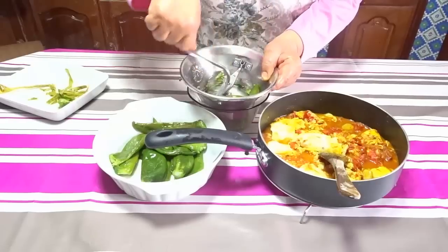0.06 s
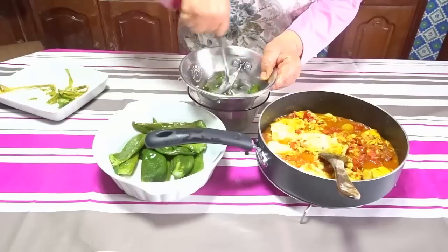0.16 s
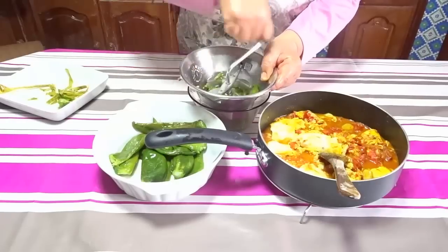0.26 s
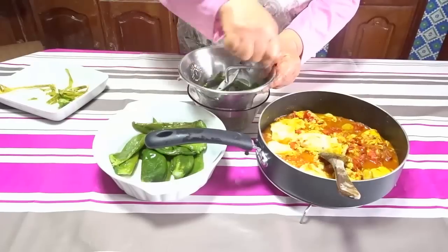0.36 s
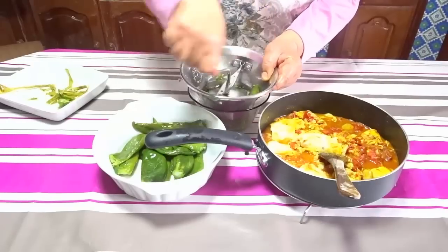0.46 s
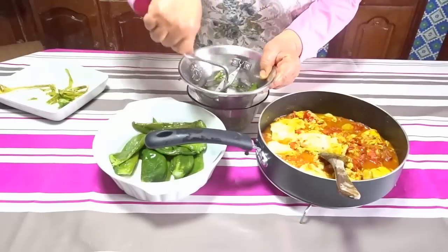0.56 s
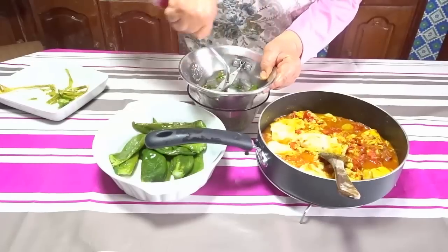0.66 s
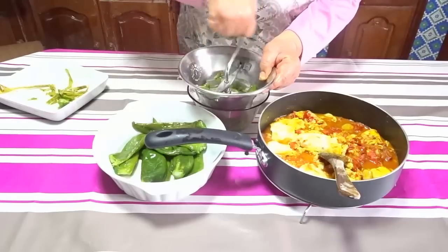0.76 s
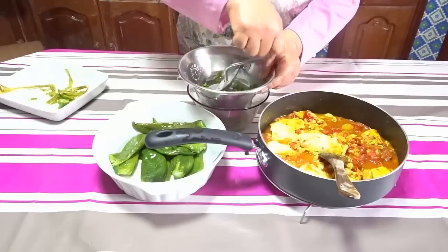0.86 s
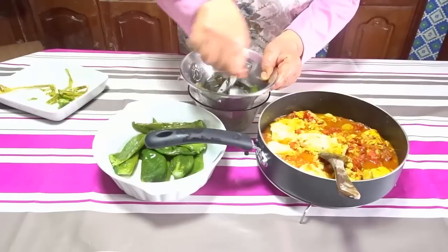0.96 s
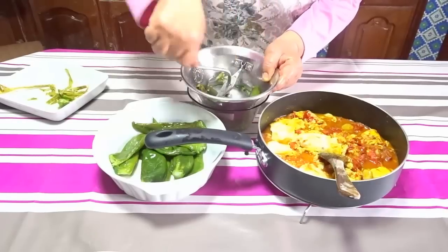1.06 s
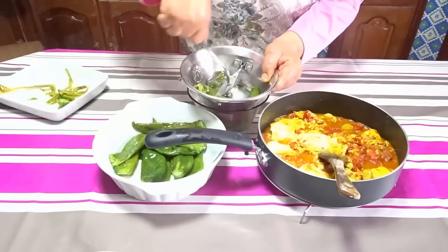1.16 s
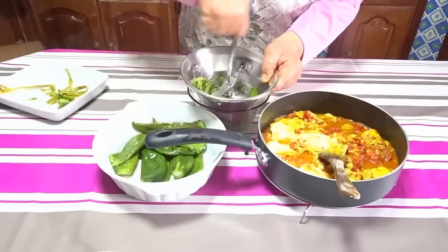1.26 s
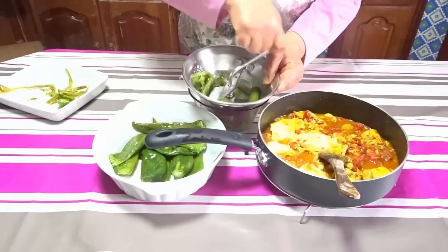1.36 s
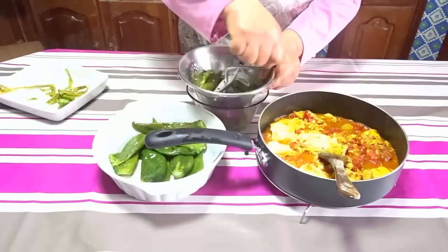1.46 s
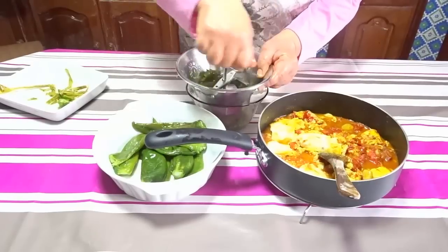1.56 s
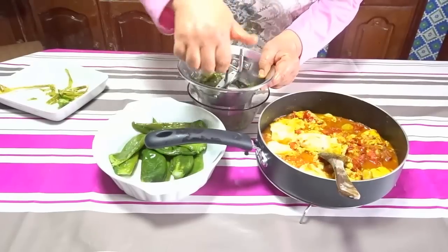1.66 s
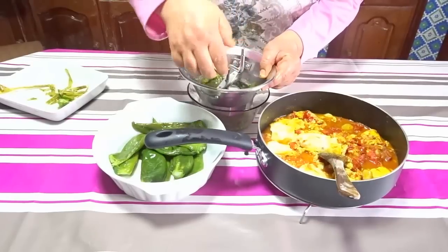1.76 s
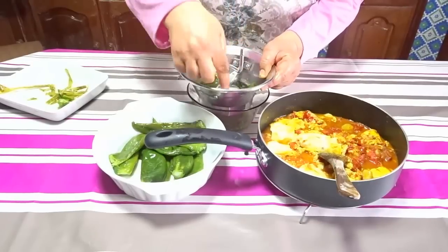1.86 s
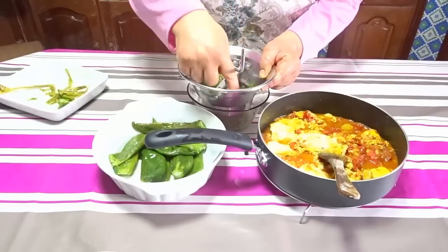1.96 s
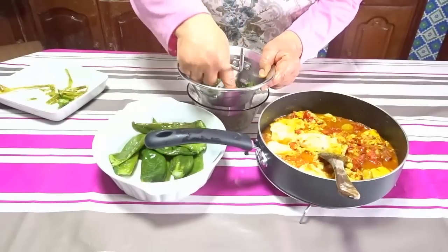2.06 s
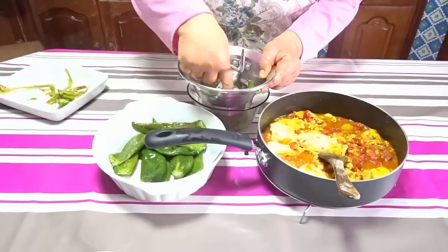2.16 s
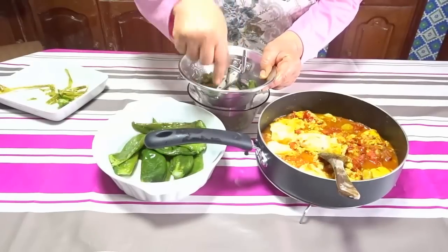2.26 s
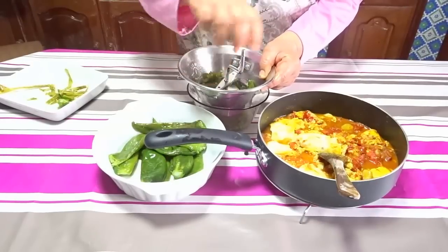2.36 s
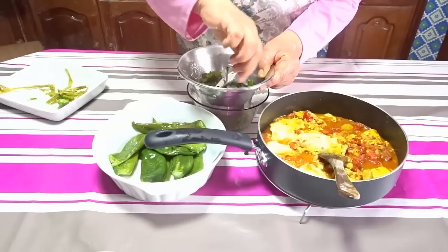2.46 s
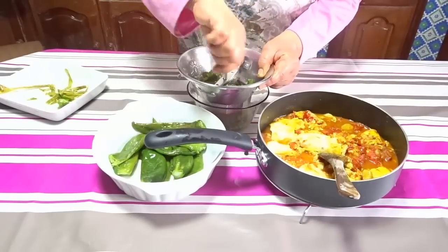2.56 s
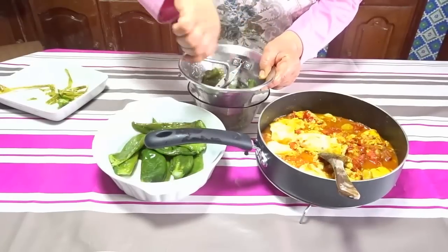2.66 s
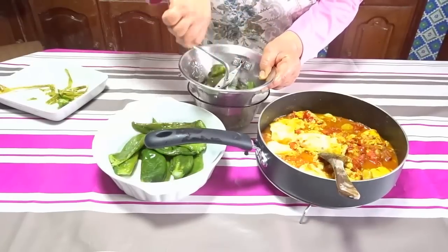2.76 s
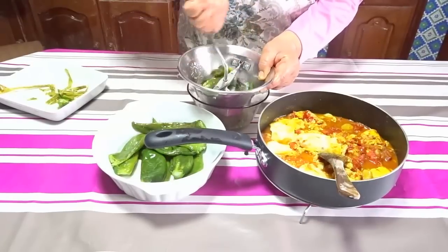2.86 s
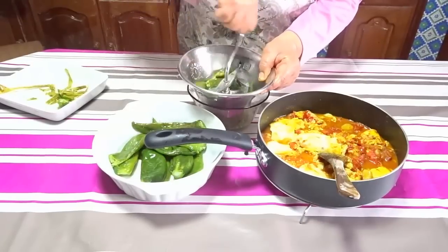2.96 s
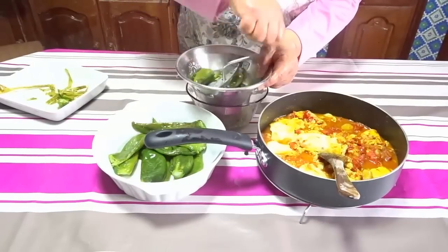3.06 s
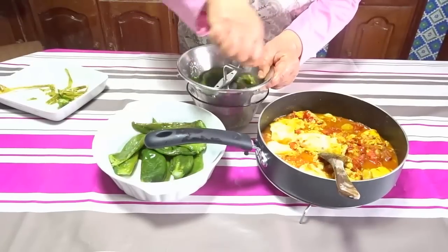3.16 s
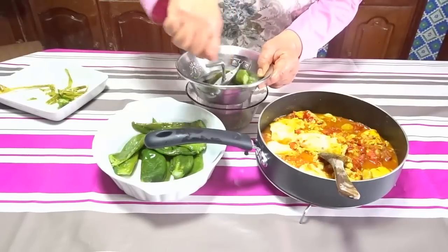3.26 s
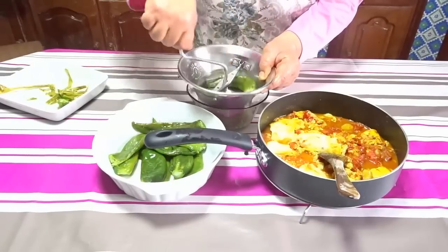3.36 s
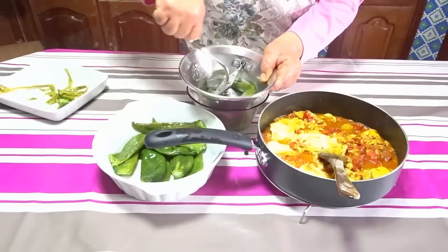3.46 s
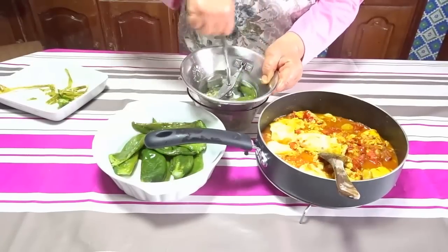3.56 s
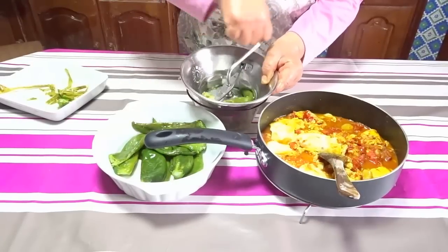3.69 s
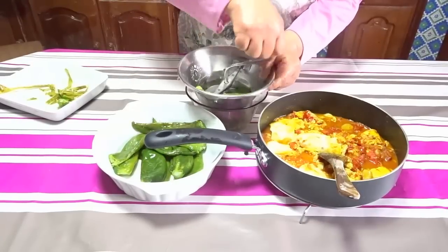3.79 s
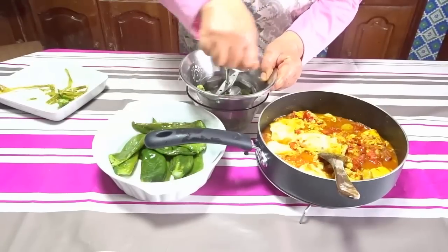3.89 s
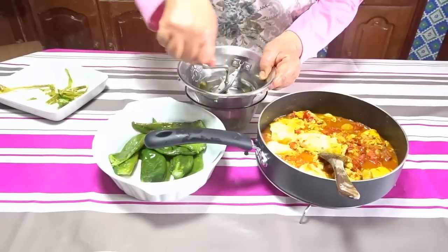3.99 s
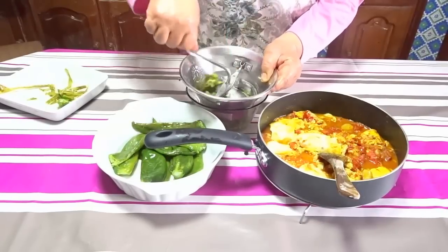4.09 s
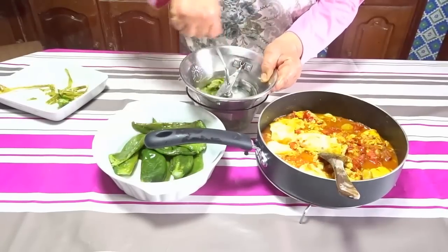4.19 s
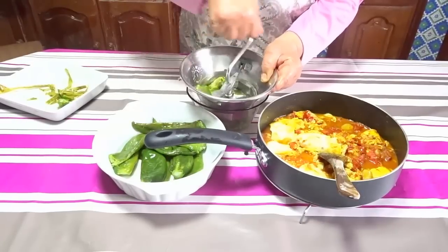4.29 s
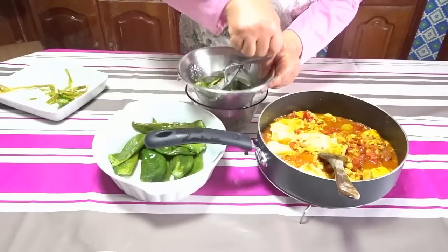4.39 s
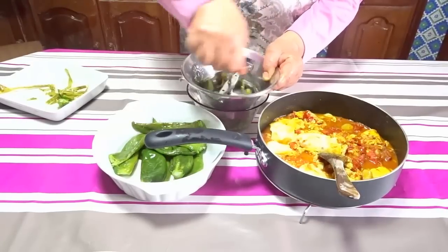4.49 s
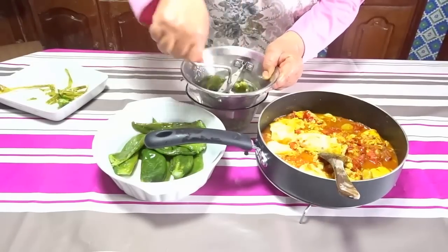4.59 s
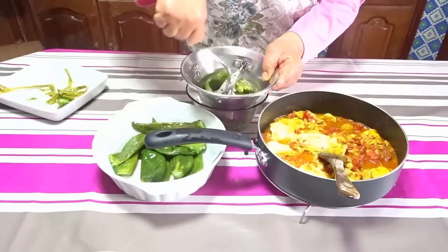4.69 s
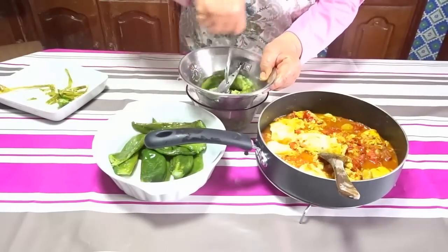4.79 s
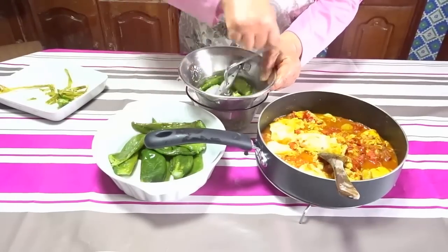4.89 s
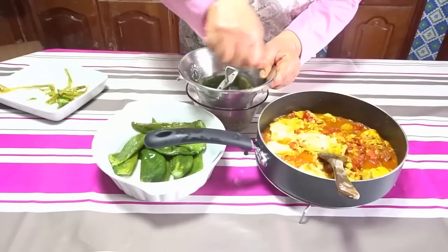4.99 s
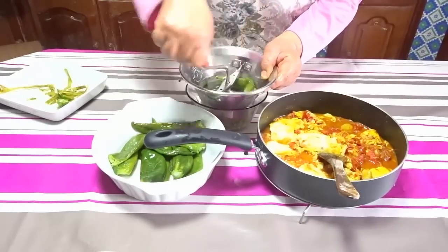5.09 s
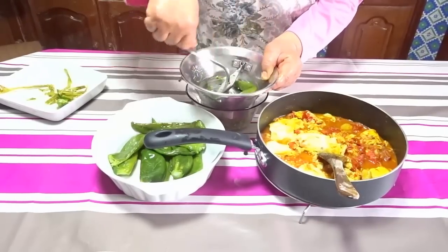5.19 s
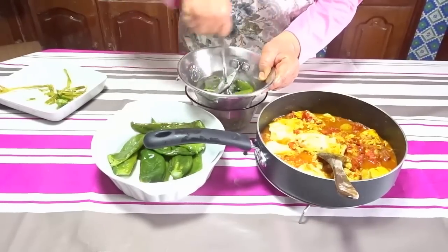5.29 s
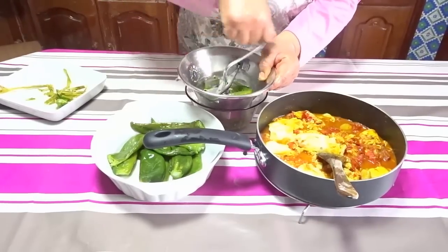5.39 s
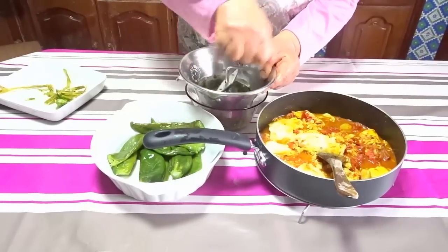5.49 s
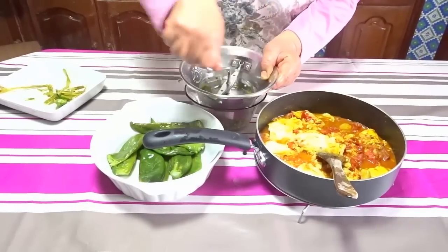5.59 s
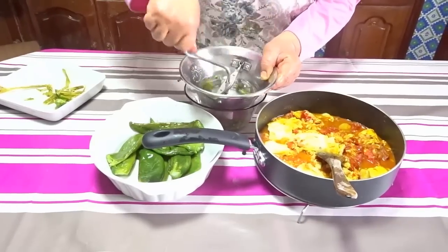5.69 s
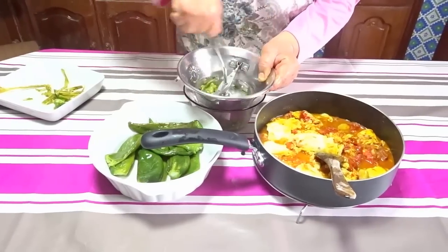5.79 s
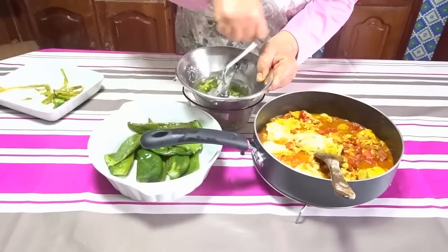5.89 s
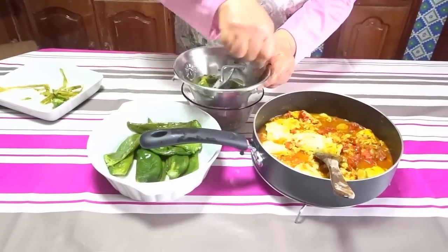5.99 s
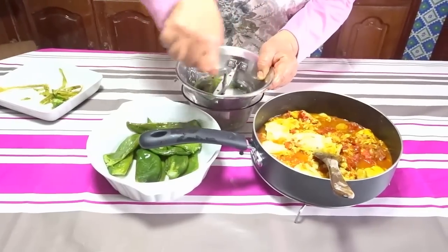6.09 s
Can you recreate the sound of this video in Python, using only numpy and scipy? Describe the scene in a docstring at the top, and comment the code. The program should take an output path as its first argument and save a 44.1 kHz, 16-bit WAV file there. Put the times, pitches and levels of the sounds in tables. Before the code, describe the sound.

Steel food mill turning over a glass bowl in a kitchen: rasping strokes, cracks and clinks, a short lull, then busier cranking.

```python
"""Scraping and sharp cracks: a steel food mill, hand-cranked over a glass bowl on a kitchen table.
The blade rasps over the perforated disc, which drones, and catches with cracks. The mill rocks and
knocks the bowl; glass and steel ring, the table thumps, a loose part pings. The work nearly stops
a little after 2 s, then resumes. The kitchen adds a short tail and a steady hush."""
import sys
import numpy as np
from scipy import signal
from scipy.fft import rfft, irfft
from scipy.io import wavfile
from scipy.ndimage import uniform_filter1d

SR = 44100
rng = np.random.default_rng(int(sys.argv[2]) if len(sys.argv) > 2 else 0)


def dump(signal):
    """Clip the signal to [-1, 1] and save it as 16-bit WAV at the path in sys.argv[1]."""
    limited = np.clip(np.atleast_2d(signal).T, -1, 1)
    pcm = np.round(limited * 32767).astype(np.int16)
    wavfile.write(sys.argv[1], SR, pcm)


N = 270774

# Scraping effort. Each row: time in seconds, blade rasp in dB, disc drone in dB.
SCRAPE_LEVELS = [(0.0, -33, -39), (0.17, -49.5, -79), (0.45, -39, -42.5), (0.72, -41.5, -41.5),
                 (0.99, -43, -43.5), (1.17, -37, -39.5), (1.47, -45.5, -46), (1.599, -49, -57),
                 (2.05, -62.5, -55), (2.33, -97, -75), (2.6, -57.5, -68), (2.85, -43.5, -41.5),
                 (3.05, -46.5, -52), (3.57, -37.5, -41), (3.8, -45.5, -48.5), (4.05, -45.5, -56),
                 (4.27, -34.5, -50), (4.37, -54, -54), (4.51, -38.5, -45), (4.79, -39, -52),
                 (4.9, -45.5, -43), (5.27, -35, -41.5), (5.39, -44, -50), (5.878, -33.5, -45),
                 (6.02, -45.5, -60), (6.14, -30, -29)]
# Disc damped by pulp. Each row: frequency in Hz, bandwidth in Hz, level in dB.
DISC_MODES = [(800, 53, -5.5), (844.3, 33, 4), (880, 7, -9), (946, 51, -0.5), (1017, 83, -3.5),
              (1860, 120, -9.5), (4800, 120, -6)]
# Kitchen table. Each row: frequency in Hz, level in dB, T60 in seconds.
TABLE_MODES = [(116, -3, 0.097), (154.3, 1.5, 0.096), (181, -1, 0.13), (240, -0.6, 0.18),
               (288.6, -2.5, 0.099), (423, -12, 0.12)]
# Contact noise. Each row: frequency in Hz, spectral level in dB.
CRACK_SPECTRUM = [(120, -30), (200, -8.5), (500, -10), (2210, -2.5), (2610, -5), (3190, -4.5), (4040, -9.5),
                  (4950, -8), (5840, -12), (9750, -17.5), (16000, -26.5)]


def gain(db):
    return 10 ** (np.asarray(db) / 20)


def decay(t, t60_s):
    return gain(-60 * t / t60_s)


def attack(t, rise_s):
    return np.minimum(t / rise_s, 1)


def unit_rms(x):
    return x / np.sqrt(np.mean(x ** 2) + 1e-20)


def unit_peak(x):
    return x / (abs(x).max() + 1e-20)


def curve_at(points, hz):
    knots_hz, values = np.transpose(points)
    return np.interp(np.log(hz + 1), np.log(knots_hz + 1), values)


def add(mix, start_s, sound):
    part = mix[max(round(start_s * SR), 0):][:len(sound)]
    part += sound[:len(part)]


def colour(x, points, shelf_hz=0, shelf_db=0):
    """Filter by (Hz, dB) points and a high shelf."""
    hz = np.fft.rfftfreq(x.shape[-1], 1 / SR)
    shelf = hz ** 2 / (hz ** 2 + shelf_hz ** 2 + 1)
    return irfft(rfft(x) * gain(curve_at(points, hz) + shelf_db * shelf), x.shape[-1])


def resonate(x, hz, width_hz):
    """Two-pole resonance, centre gain near 1."""
    r, w = np.exp(-np.pi * width_hz / SR), 2 * np.pi * hz / SR
    return signal.lfilter([2 * (1 - r) * np.sin(w)], [1, -2 * r * np.cos(w), r * r], x)


def struck(modes, t, rise_s, spread_db):
    """Decaying sines; the struck spot varies each mode's level."""
    hz, db, t60_s = np.transpose(modes)[:, :, None]
    spot = rng.standard_normal((len(modes), 1))
    envelopes = gain(db + spread_db * spot) * decay(t, np.clip(t60_s, 0.03, 1))
    sines = np.sin(2 * np.pi * hz * t + 20 * spot[::-1])
    return unit_peak((envelopes * sines).sum(0) * attack(t, rise_s))


def impulses(per_s, scale_db):
    """Random impulses, mostly small."""
    sizes = gain(scale_db * np.minimum(rng.exponential(1, N), 4))
    return sizes * (rng.random(N) < per_s / SR)


def diffuse_noise(samples):
    """Stereo noise, alike in the bass, independent in the treble."""
    # Each row: frequency in Hz, left-right correlation.
    coherence = [(60, 0.99), (180, 1), (550, 0.86), (1650, 0.53), (4970, 0.05), (15000, 0.04)]
    mid, side = rfft(rng.standard_normal((2, samples)))
    angle = np.arccos(np.clip(curve_at(coherence, np.fft.rfftfreq(samples, 1 / SR)), -1, 1)) / 2
    mid, side = np.cos(angle) * mid, np.sin(angle) * side
    return irfft([mid + side, mid - side], samples)


def scrape():
    """The blade rubs over wet holes in uneven clumps; the disc drones, the table rumbles."""
    # Blade edge. Each row: frequency in Hz, spectral level in dB.
    rasp_spectrum = [(180, -33), (300, -2), (574, -7.5), (870, 1.5), (1340, -1.5), (8790, -6.5),
                     (13800, -16.5), (16000, -75)]
    times_s, *levels_db = np.transpose(SCRAPE_LEVELS)
    rasp_db, drone_db = (np.interp(np.arange(N) / SR, times_s, db) for db in levels_db)
    rumble_db = rasp_db + 0.63 * (drone_db - rasp_db) - 7.5
    wander = uniform_filter1d(uniform_filter1d(rng.standard_normal(N), 300), 300)
    clumps = gain(2.14 * unit_rms(wander))
    ticks = impulses(per_s=4000, scale_db=2.1) * rng.choice([-1, 1], N)
    friction = unit_rms(0.5 * unit_rms(ticks) + rng.standard_normal(N)) * clumps
    drone = sum(gain(db) * resonate(resonate(friction, hz, 2 * width_hz), hz, width_hz)
                for hz, width_hz, db in DISC_MODES)
    tilt_db_per_octave, lowest_hz = -14.5, TABLE_MODES[0][0]  # slow rubbing favours low modes
    rumble = sum(gain(db + tilt_db_per_octave * np.log2(hz / lowest_hz))
                 * resonate(friction, hz, 3.7 / t60_s) for hz, db, t60_s in TABLE_MODES)
    rasp = unit_rms(colour(friction, rasp_spectrum)) + gain(-4.5) * crackle()
    return gain(drone_db) * unit_rms(drone) + gain(rasp_db) * rasp + gain(rumble_db) * unit_rms(rumble)


def crackle():
    """Small catches on skins and seeds, milliseconds each."""
    catches = impulses(per_s=60, scale_db=3.15)
    envelope = signal.oaconvolve(catches, decay(np.arange(2048) / SR, t60_s=0.011))[:N]
    bursts = envelope * rng.standard_normal(N)
    return unit_rms(unit_rms(colour(bursts, CRACK_SPECTRUM)) + 0.85 * unit_rms(disc_clank(bursts)))


def disc_clank(force):
    """The damped disc answers a catch with a hollow clank."""
    return sum(gain(db) * resonate(force, hz, width_hz) for hz, width_hz, db in DISC_MODES)


def crack(noise, hz, treble_db, chatter_db, clank_db):
    """Sharp contact: the touched spot rings briefly, loose parts chatter, the disc clanks."""
    t = np.arange(len(noise)) / SR
    burst = unit_rms(colour(noise, CRACK_SPECTRUM, shelf_hz=3250, shelf_db=treble_db + 18.5))
    burst *= attack(t, rise_s=0.00034)
    contact = unit_peak(burst * decay(t, t60_s=0.0088))
    snap = decay(t, t60_s=0.014) * np.sin(2 * np.pi * hz * t)
    chatter = gain(chatter_db) * unit_peak(burst * decay(t, t60_s=0.26))
    clank = gain(clank_db) * unit_peak(disc_clank(contact))
    return unit_peak(contact + gain(-3) * snap) + chatter + clank


def bowl_and_mill(t, noise, bowl_db):
    """Glass bowl and steel mill ring from the blow and its rebounds."""
    # Each row: frequency in Hz, level in dB, T60 in seconds.
    bowl_modes = [(998, -9.5, 0.24), (1118, -14, 0.2), (1200, -11.5, 0.22), (1400, -11, .2),
                  (1595, -3.5, 0.5), (1838, -8, 0.4), (1970, -10, 0.3), (2795, -8.5, 0.28), (3198, -8, 0.2),
                  (3455, -7, 0.2), (4330, -10, 0.2), (4400, -14, 0.22), (4920, -14.5, 0.16),
                  (5200, -16, 0.15), (6160, -15.5, 0.18), (6560, -14, .12)]
    mill_modes = [(1496, -10, 0.074), (1670, 8, 0.067), (1767, -24, 0.33), (1767, -14, 0.043),
                  (2100, -4, 0.084), (2183, 8, 0.048), (2300, -0.5, 0.18), (2352, 4.5, 0.08),
                  (2610, -38, 0.04), (3400, 0.5, 0.091), (3654, 8.5, 0.05), (3680, -10, 0.38),
                  (5020, 7, 0.026), (4800, -28, .1), (5660, -37, 0.12), (8680, -1.5, 0.044)]
    blow_t = np.arange(len(noise)) / SR
    blows = (blow_t == 0) + gain(-21.5) * decay(blow_t, t60_s=0.12) * noise
    out = np.zeros(len(t))
    for modes, rise_s, db in (bowl_modes, 0.00072, bowl_db), (mill_modes, 0.003, -14.5):
        ring = struck(modes, t, rise_s, spread_db=2.5)
        out += gain(db) * unit_peak(signal.fftconvolve(ring, blows)[:len(t)])
    return out


def knocks():
    """The blade catches or the mill rocks: a crack, ringing, a thump of the table."""
    # Each row: start in seconds, crack level in dB, crack pitch in Hz,
    # then relative thump, treble and bowl levels in dB.
    blows = [(0.004, -14.5, 2240, -29, -20, -13), (0.109, -17.5, 3120, -18, -6, -15),
             (0.127, -2, 1493, -14.5, -17, -11), (0.212, -8.5, 1670, -34, -17, -15),
             (0.281, -6, 1810, -25, -19, -27), (0.341, -11, 6370, -25, -17, -32),
             (0.419, -33, 3080, -16, -13, -11), (0.493, -11, 2400, -11.5, -30, -16),
             (0.595, -19, 1820, -34, -22, -21), (0.618, -16.5, 1620, -35, -2, -35),
             (0.647, -19.5, 2870, -43, -24, -26), (0.722, -11, 1940, -36, -19, -40),
             (0.875, -16.5, 4910, -34, -10, -17), (1.006, -15, 2050, -41, -25, -32),
             (1.053, -17, 1490, -14, -14, -9), (1.068, -2.5, 3540, -16, -20, -8),
             (1.195, -13, 3440, -12, -17, -6.5), (1.211, -8, 2020, -10.5, -21, -17),
             (1.225, -8, 1880, -26, -34, -11.5), (1.354, -13.5, 1860, -38, -18, -25),
             (1.4, -10, 4730, -16.5, -12, -25), (1.478, -12.5, 1830, -51, -14.5, -28),
             (1.771, -19, 1730, -13, -38, -7), (1.889, -16.5, 1780, -13, -24.5, -13),
             (2.141, -22.5, 3180, -8, -32.5, -6.5), (2.552, -32, 2150, -30, -21, -27),
             (2.75, -25.5, 2850, -31, 19, -30), (2.8, -21, 1790, -49, -51, -29),
             (2.812, -29, 1800, -38, -18, -14), (2.836, -20, 1840, -49, 3, -28),
             (2.878, -21.5, 6310, -42, -15, -17), (2.898, -19, 1830, -44, -22, -32),
             (2.922, -19.5, 4130, -46, -15, -19), (2.969, -22, 1850, -21, -21, -31),
             (3.087, -20.5, 1700, -21, -15, -25), (3.385, -27, 4630, -15, 9, -16),
             (3.497, -22.5, 6750, -12.5, 11, -24), (3.559, -19, 2100, -13, -55, -29),
             (3.631, -10, 2290, -10.5, -13, -31), (3.664, -11, 1280, -9.5, -10, -30),
             (3.782, -21, 1950, -10, -64, -14.5), (3.8, -16.5, 3200, -13, -28, -7),
             (3.92, -21.5, 2280, -12.5, -39, -10), (4.092, -12.5, 1890, -16, -26.5, -24),
             (4.145, -7.5, 2800, -23.5, -11, -30), (4.251, -11.5, 1840, -12.5, -18, -15),
             (4.316, -11, 1650, -16, -20, -21.5), (4.443, -11.5, 2930, -23, -5, -12),
             (4.458, -9, 3340, -20, -21, -7.5), (4.521, -1, 1800, -17.5, -20, -17),
             (4.594, -12, 1660, -29, -26, -19), (4.66, -5.5, 1860, -22.5, -17.5, -16),
             (4.707, -11.5, 1750, -23, -27, -17), (4.761, -7, 1620, -32, -20, -26),
             (4.789, -15.5, 2410, -10, -27, -19), (4.973, -19, 1930, -37, -16, -16),
             (5.073, -6.5, 1710, -16.5, -20, -22.5), (5.195, -12, 1820, -11.5, -24, -15),
             (5.297, -13.5, 2400, -10.5, -33, -29), (5.477, -24, 2300, -33, 2, -22),
             (5.496, -21.5, 3600, -39, 2, -12), (5.568, -7, 1510, -30, -16, -35),
             (5.576, -4.5, 2400, -14, -25, -10.5), (5.683, -15, 1640, -22, -23, -15),
             (5.741, -3, 6580, -23.5, -3, -34), (5.848, -2.5, 2150, -16, -14.5, -16),
             (5.9, -7.5, 2380, -19, -21, -14), (5.936, -15, 1550, -30, -1, -24),
             (6.017, -13.5, 1660, -14, -21, -8.5), (6.075, -11, 1600, -12.5, -18, -15),
             (6.101, -1.5, 1820, -25, -19, -23)]
    out, t = np.zeros(N), np.arange(SR // 2) / SR
    times_s, rasp_db, drone_db = np.transpose(SCRAPE_LEVELS)
    for start_s, db, hz, thump_db, treble_db, bowl_db in blows:
        noise = rng.standard_normal(4096)
        # Hard blows and rocking against the bowl shake the loose parts more.
        chatter_db = -3.5 + 0.08 * db + 0.35 * bowl_db
        # The disc clanks more freely while it drones.
        clank_db = -6 + 0.34 * db + 0.6 * np.interp(start_s, times_s, drone_db - rasp_db)
        add(out, start_s, gain(db) * crack(noise, hz, treble_db, chatter_db, clank_db))
        ring = bowl_and_mill(t, noise[::-1], bowl_db)
        thump = gain(thump_db) * struck(TABLE_MODES, t, rise_s=0.011, spread_db=1)
        add(out, start_s, gain(db) * (ring + thump))
    return out


def pings():
    """A loose steel part sounds short, high notes."""
    # Each row: start in seconds, level in dB, pitch in Hz.
    notes = [(0.0044, -20.5, 6970), (0.4189, -31, 6720), (0.5382, -25, 7020), (2.551, -36, 7030),
             (4.3344, -22, 7020), (4.444, -15, 7040), (4.5966, -26, 6840), (5.0724, -18, 6830),
             (5.855, -16, 6800)]
    out, t = np.zeros(N), np.arange(4096) / SR
    envelope = attack(t, rise_s=0.0013) * decay(t, t60_s=0.03)
    for start_s, db, hz in notes:
        add(out, start_s, gain(db) * envelope * np.sin(2 * np.pi * hz * t))
    return out


def near_scatter(x):
    """Dishes and table top scatter treble within milliseconds, differently per side."""
    t = np.arange(1024) / SR
    taps = diffuse_noise(len(t)) * decay(t, t60_s=0.016) * attack(t, rise_s=0.0023)
    taps /= np.linalg.norm(taps, axis=1)[:, None]
    scattered = signal.oaconvolve(x[None], taps, axes=1)[:, :N]
    return colour(scattered, [(800, -26.5), (3000, -5), (10000, -4)])


def kitchen_reverb(x):
    """Three decaying noise tails, fed in turn so that knocks echo differently."""
    # Each row: frequency in Hz, T60 in seconds.
    decay_times = [(100, 0.095), (300, 0.4), (1000, 0.54), (3000, 0.53), (6000, 0.3), (12000, 0.42)]
    # Each row: frequency in Hz, echo level over direct sound in dB.
    echo_spectrum = [(100, 0.5), (500, -3.5), (2000, -7.5), (6000, -3), (12000, -6)]
    out, turn_hz = np.zeros((2, N)), 1.7
    turn_rad = 2 * np.pi * turn_hz * np.arange(N) / SR
    for k in range(3):
        hz, t, bands = signal.stft(diffuse_noise(SR * 3 // 4), SR, nperseg=256)
        bands *= decay(t, curve_at(decay_times, hz)[:, None])
        tail = signal.istft(bands, SR, nperseg=256)[1]
        tail *= np.clip(np.arange(tail.shape[1]) / SR / 0.007 - 0.4, 0, 1)  # first echoes: table top
        tail /= np.linalg.norm(tail[0])
        share = np.sqrt(2 / 3) * np.cos(turn_rad + k * np.pi / 3)
        out += signal.fftconvolve((x * share)[None], tail, axes=1)[:, :N]
    return colour(out, echo_spectrum)


def room_hush():
    """Steady diffuse noise of the quiet kitchen."""
    # Each row: frequency in Hz, spectral level in dB.
    hush_spectrum = [(15, -48), (25, -28), (49, -5.5), (180, -6), (242, -11), (476, -8.5), (516, -4.5),
                     (560, -11), (1100, -9), (10700, -28.5), (16000, -60)]
    return gain(-58) * unit_rms(colour(diffuse_noise(N), hush_spectrum))


def scene():
    """The mill, slightly left, with its reflections and the hush."""
    mill = knocks() + pings() + scrape()
    direct = mill * gain([[-2.7], [-3.2]])
    return direct + near_scatter(mill) + kitchen_reverb(mill) + room_hush()


def record(dry):
    """The microphone weakens deep bass and treble above 11 kHz and rounds peaks; a low-pass follows."""
    ceiling, cutoff_hz = 0.69, 16100
    shaped = colour(dry, [(30, -4.5), (70, 0.5), (100, 0.5), (10800, -3), (11400, -10), (15000, -7.5)])
    rounded = ceiling * np.tanh(shaped / ceiling)
    lowpass = signal.firwin(1023, cutoff_hz, window=("kaiser", 11), fs=SR)
    return signal.oaconvolve(rounded, lowpass[None], "same")


dry = scene()
out = record(dry)
dump(out)
```